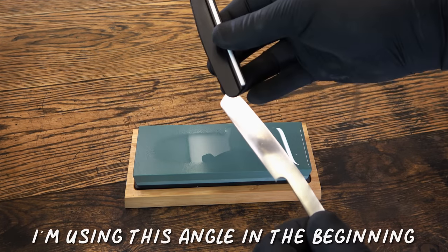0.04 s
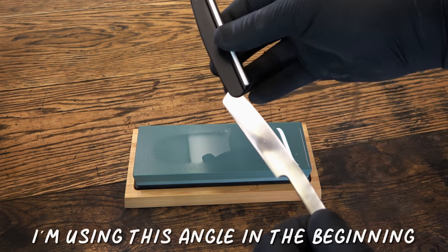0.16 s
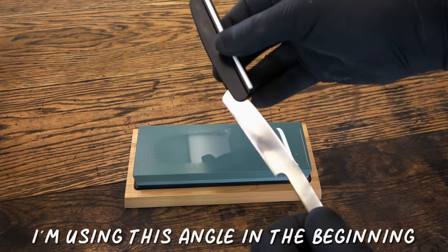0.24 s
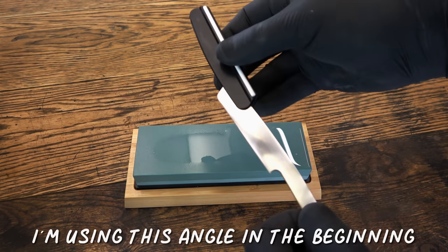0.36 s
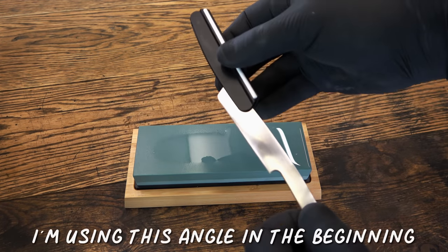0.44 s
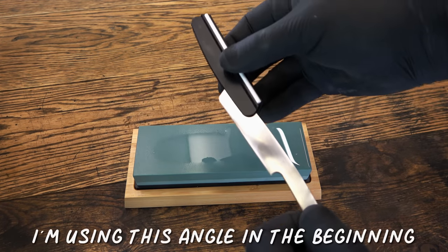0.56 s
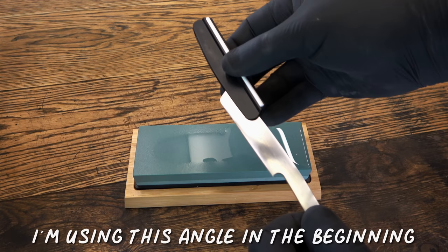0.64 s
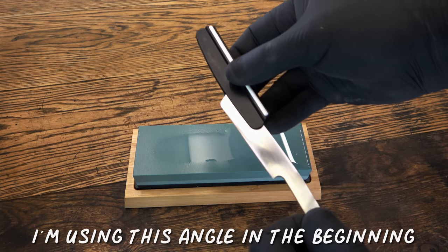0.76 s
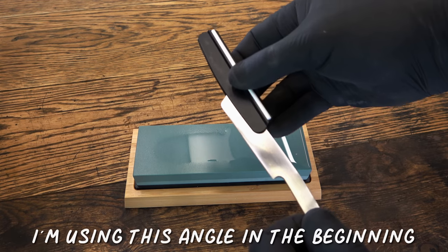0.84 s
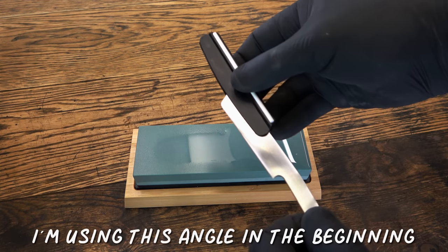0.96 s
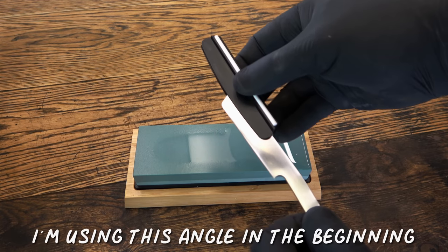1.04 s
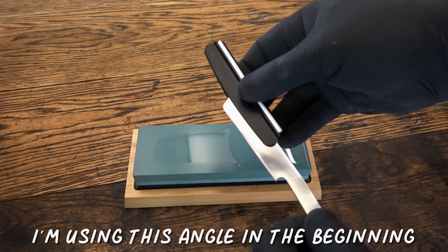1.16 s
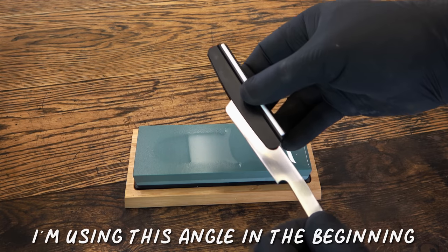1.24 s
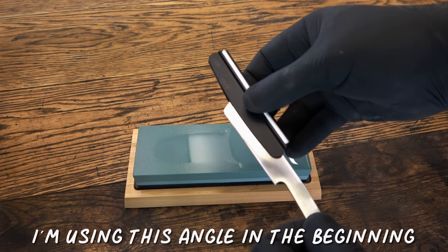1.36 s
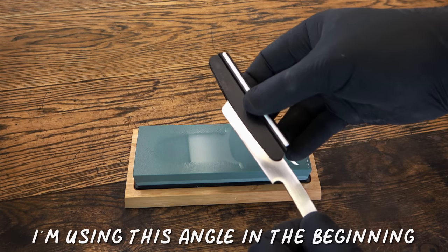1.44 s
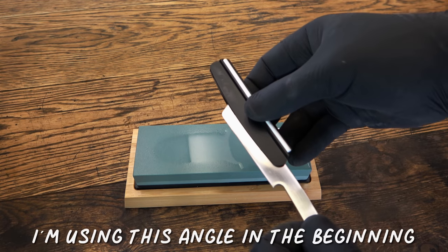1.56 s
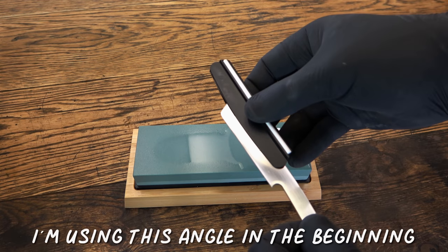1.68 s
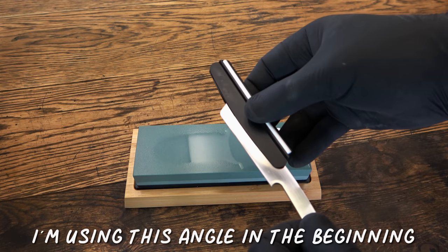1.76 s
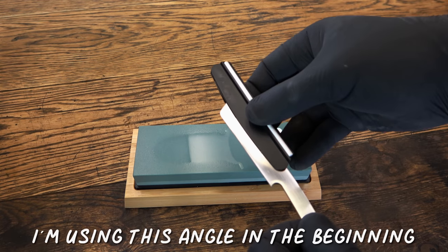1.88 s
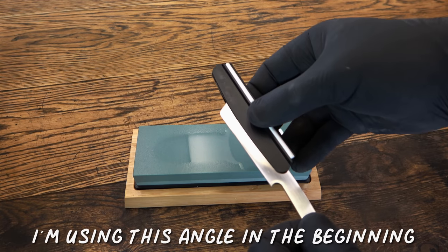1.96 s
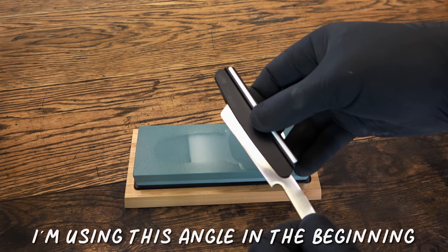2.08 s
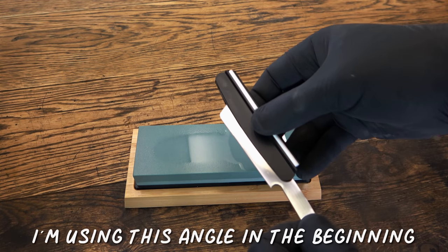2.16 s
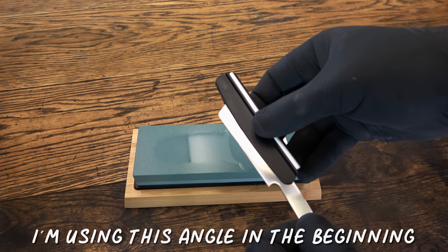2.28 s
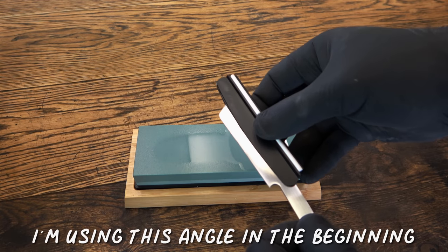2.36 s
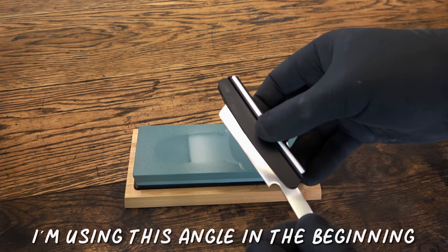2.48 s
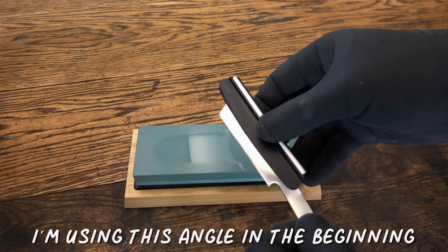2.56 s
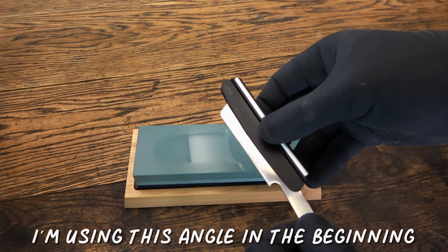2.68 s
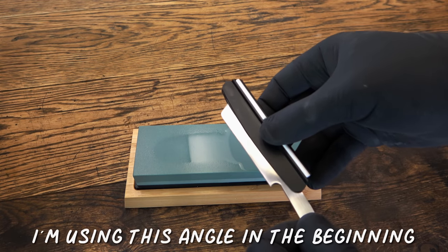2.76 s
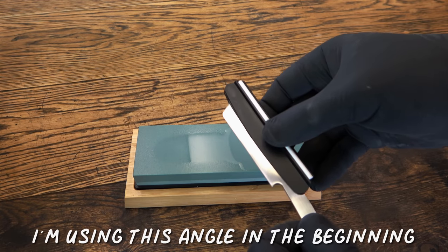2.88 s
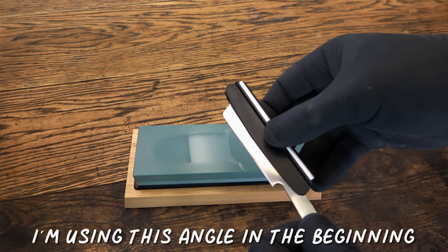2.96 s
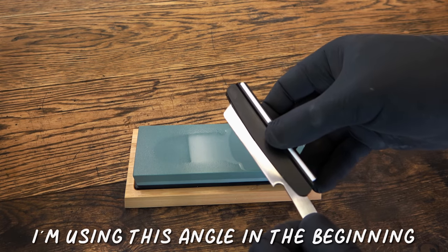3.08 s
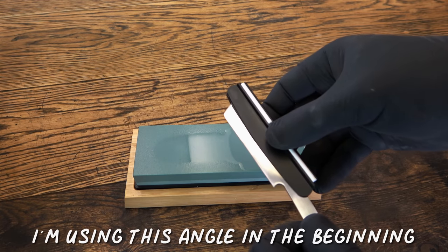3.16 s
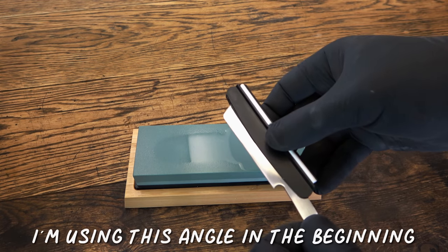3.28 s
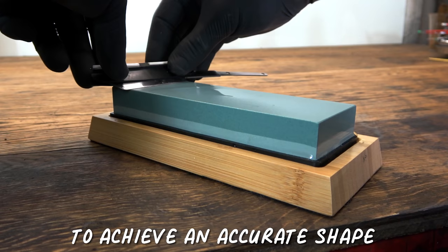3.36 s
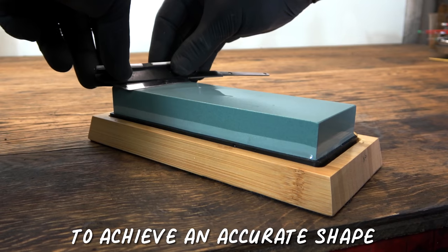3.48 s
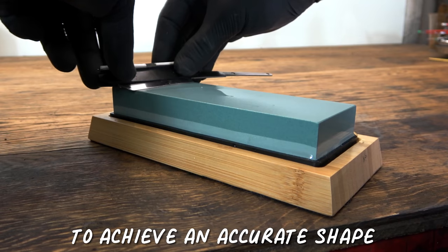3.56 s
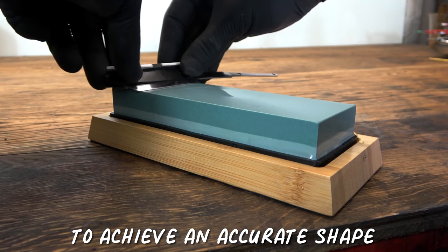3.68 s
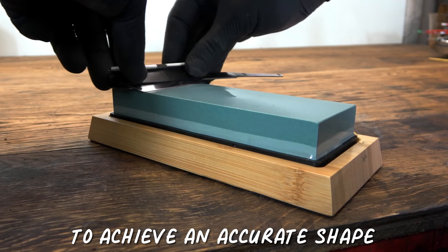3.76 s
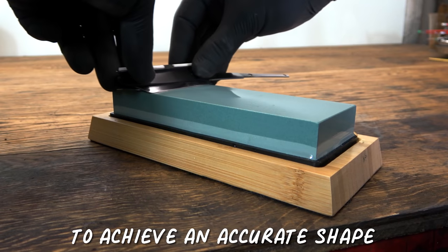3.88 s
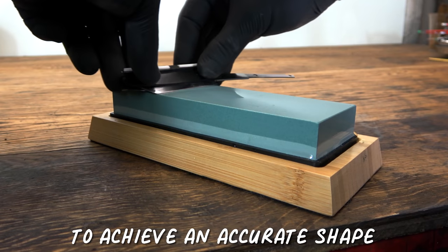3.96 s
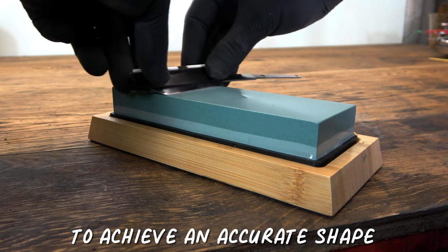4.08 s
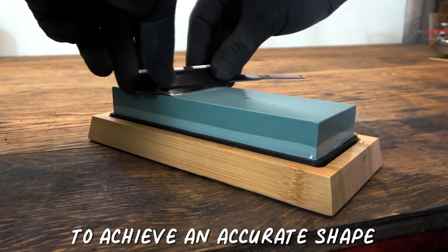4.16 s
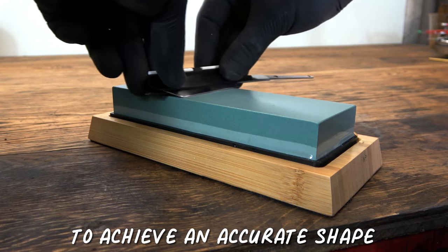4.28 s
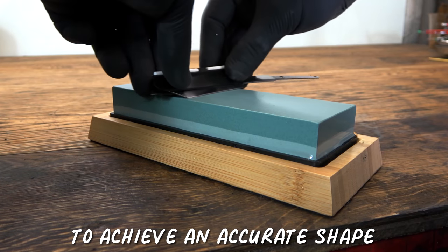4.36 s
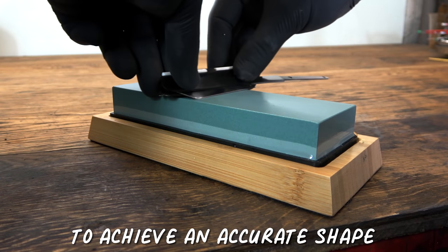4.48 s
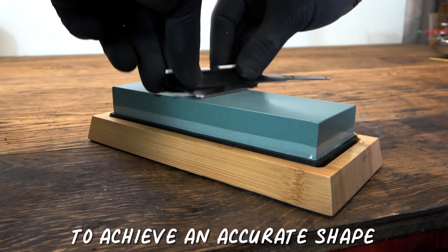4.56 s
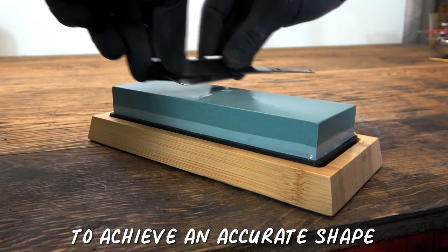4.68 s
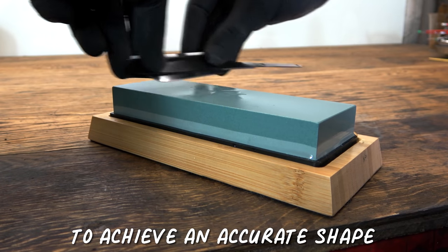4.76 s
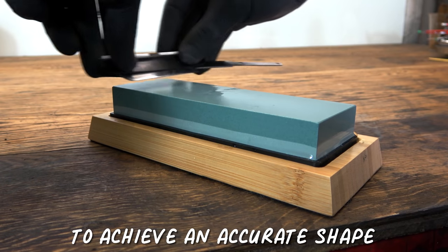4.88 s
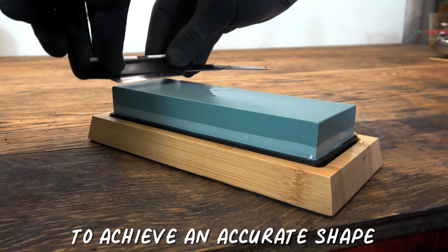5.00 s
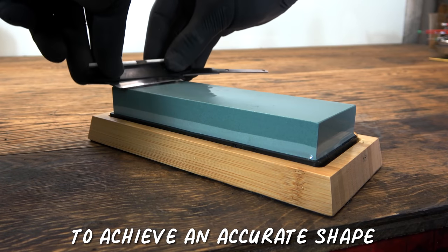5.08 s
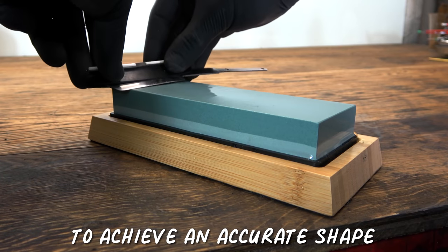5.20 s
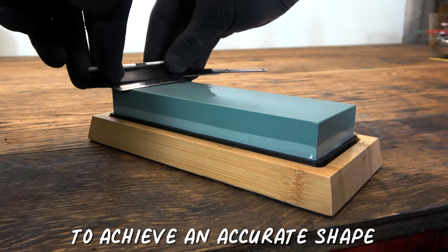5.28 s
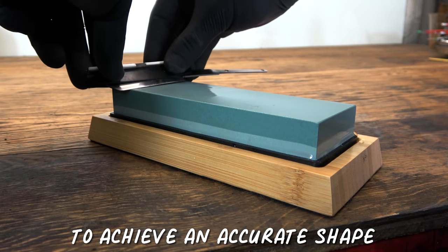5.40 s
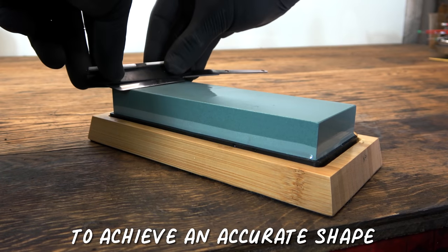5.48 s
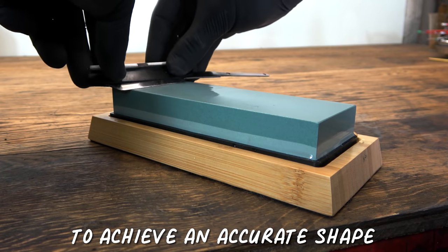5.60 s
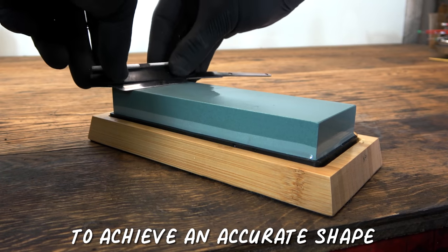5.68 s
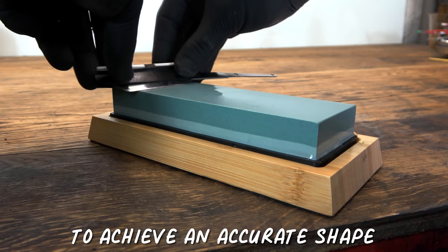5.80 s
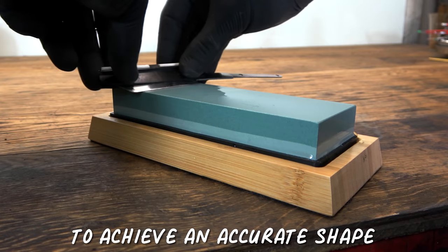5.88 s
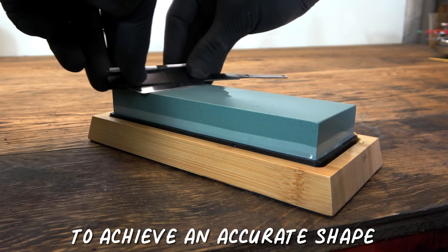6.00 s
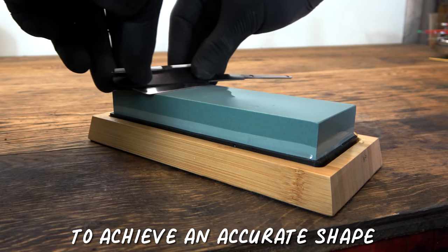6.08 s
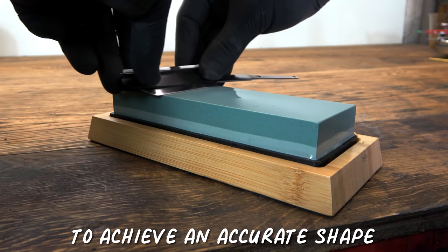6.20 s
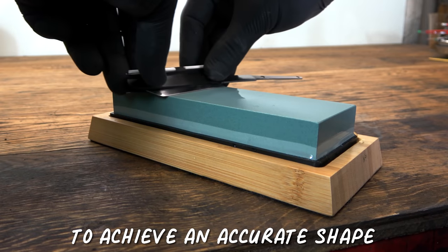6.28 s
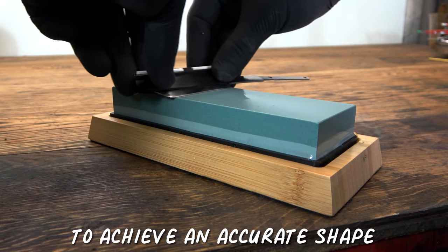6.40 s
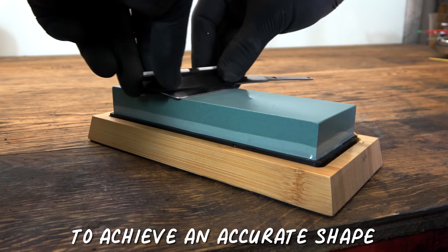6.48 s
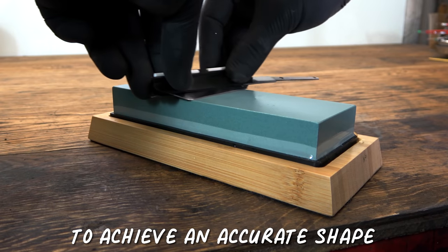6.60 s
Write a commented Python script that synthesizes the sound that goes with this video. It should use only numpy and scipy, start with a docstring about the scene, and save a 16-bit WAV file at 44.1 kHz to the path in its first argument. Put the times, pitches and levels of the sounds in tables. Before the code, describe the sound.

A close, dry take in a quiet workshop with a faint, steady hiss. From about 0.2 to 1.5 seconds a thin steel blade barely touches a wet whetstone: a small tick near 0.35, brief airy slides, another tick near 1.1. Soft, dull knocks from the wooden base come around 1.7 to 1.9, then it is almost silent. At 3.5 a double click bites into a firm, even, gritty scrape, bright and hissing with metallic resonance and a coarse stone rasp beneath. Around 4.34 the edge sticks for an instant and snaps loose with sharp clicks, continuing until about 4.65, when it lifts abruptly. The background is now quieter. Between 5.3 and 5.7 a flurry of tiny metallic taps and grazes grows stronger, and at about 5.74 a sharper tick opens the second firm scrape, which swells quickly and stays steady, slightly darker, until about 6.65.

```python
"""First comes a faint hiss with small ticks and light slides: a thin steel blade is eased across a wet whetstone.
It is then pressed into a firm stroke from tip to heel, lifted, set down with taps and pushed into a second stroke.
Grit rubs the edge into noise, and the blade's resonances change with the place where the edge touches.
The stone adds a coarse rasp, its wooden base dull knocks and rumble, and the quiet workshop a short, weak echo."""
import sys
import numpy as np
from scipy import signal
from scipy.fft import rfft, irfft, next_fast_len
from scipy.io import wavfile
from scipy.ndimage import map_coordinates

SR = 44100
rng = np.random.default_rng(int(sys.argv[2]) if len(sys.argv) > 2 else 0)


def put_to_file(sound):
    """Save the sound as 16-bit audio at rate SR, in the file named by the first command-line argument."""
    columns = np.atleast_2d(sound).T  # one column per channel
    safe = np.clip(columns, -1, 1)
    whole_steps = np.round(safe * 32767)
    wavfile.write(sys.argv[1], SR, whole_steps.astype(np.int16))


N = 292824

# background hiss before and after the firm strokes begin: pitch_hz, level_db (per Hz)
EARLY_AIR = [(12, -27), (25, -3.5), (400, -4.5), (1400, -12), (4820, -16), (14000, -20), (15000, -38)]
LATE_AIR = [(20, -11), (80, -6.5), (200, -10.5), (290, -6.5), (430, -12), (1000, -12.5), (2500, -21.5),
            (15000, -25)]
EARLY_DB, LATE_DB = -65.5, -79  # overall level of each hiss

# soft low tones that swell and die away while the blade is handled: start_s, pitch_hz, level_db, fall_s (for 20 dB)
HUMS = [(1.07, 428, -67, 0.17), (5.3, 307, -80.5, 0.4), (5.315, 907, -87, 1)]
# soft knocks of the stone in its wooden base: start_s, peak_db
KNOCKS = [(1.723, -45.5), (1.906, -50), (5.629, -59), (5.645, -58)]
# resonances of the wooden base: pitch_hz, width_hz, level_db
BASE = [(193.8, 290, 1), (480, 440, 7), (1180, 1400, -11)]
# resonances of the stone on its mat: pitch_hz, width_hz, level_db
STONE = [(960, 170, -13), (1120, 1400, -10)]

# resonances of the blade for each kind of contact, all with columns: pitch_hz, width_hz, level_db
SKIM = [(2040, 240, 0), (3800, 1540, -18), (5570, 130, 3), (6450, 560, -4.5), (7200, 190, -0.5),
        (8950, 3000, -19)]  # barely resting on the stone
GLIDE = [(2163, 360, 1), (3950, 740, -1), (5550, 450, -7), (6660, 900, -10)]  # floating on the film of water
SQUEAK = [(2100, 250, -7), (4060, 330, 0), (6500, 900, -14)]  # skating on the wet stone
FILM = [(2200, 220, 0), (4000, 900, -15)]  # hardly any weight on the wet stone
SCUFF = [(2060, 280, 0), (3680, 380, 0), (4700, 450, -9)]  # pushed off with a little more weight
DRAG = [(2050, 230, -0.5), (3610, 190, 5.5), (4540, 860, -12)]  # drawn lightly
POINT = [(2180, 260, -17), (5510, 150, 1), (6840, 300, 1), (10400, 6000, -30)]  # only the point touches
FREE = [(1850, 125, 4), (3550, 550, -18), (5200, 900, -21), (7000, 6500, -31)]  # held clear of the stone, ringing a little longer
LANDING = [(1880, 130, -1), (2450, 300, -19), (4810, 280, 3.5), (6000, 1800, -24)]  # grazing the stone from the air
TOUCH = [(1905, 150, 3), (4290, 110, -15), (4840, 350, -9), (6030, 250, -25), (9000, 6000, -52)]  # set down gently
PERCH = [(1780, 260, 4), (2540, 240, -12), (3880, 640, -16), (5150, 380, 2), (6000, 330, -7),
         (8000, 4500, -26.5)]  # rocking onto the edge
TIP = [(1880, 730, 6.5), (2500, 560, 0), (3500, 300, -2), (4006, 370, 0.5), (5110, 500, 3),
       (5680, 1300, -6.5), (8300, 3100, -10.5), (10530, 250, -4.5), (11400, 700, -21), (13970, 1620, -23.5),
       (15500, 670, -23)]  # pressed near the tip
BELLY = [(1920, 430, 1.5), (2500, 700, -11.5), (3360, 750, -14.5), (3940, 450, -9.0), (5160, 700, -10),
         (6200, 1000, -15.5), (8020, 880, -14.0), (9980, 1160, -21.0), (16480, 6250, -36.5)]  # pressed between tip and mid-edge
MIDDLE = [(1965, 440, 3), (3100, 750, -14.5), (3930, 450, -5.5), (5420, 1370, -9.0), (6760, 810, -13.0),
          (8020, 990, -13.0), (10250, 1900, -20), (16480, 2150, -28.0)]  # pressed at mid-edge
HEEL = [(2004, 514, -0.5), (2980, 400, -14.5), (3870, 810, -7), (5300, 1730, -11.5), (6520, 560, -9.5),
        (7680, 3110, -15), (9700, 1370, -18), (13800, 2600, -31)]  # pressed near the heel
FLAT_TIP = [(1910, 500, 0), (2650, 280, -15.5), (3870, 680, -9.5), (4840, 320, -6), (5470, 1100, -12.5),
            (7030, 440, -17), (8400, 1380, -18), (10600, 720, -19.5), (13290, 1420, -29.5),
            (15520, 1120, -32)]  # bevel flat on the stone, weight towards the tip
FLAT_HEEL = [(1680, 250, -12), (1986, 317, -0.5), (3840, 960, -15), (4650, 1300, -15.5), (5410, 980, -18.5),
             (6560, 710, -23), (7770, 1240, -20.5), (9320, 1200, -28), (10600, 800, -28),
             (14000, 2400, -32)]  # bevel flat on the stone, weight towards the heel

# contacts that keep their pitch: one list of resonances each (pitch_hz, width_hz, level_db)
STEADY = (SKIM, GLIDE, SQUEAK, FILM, POINT, FREE, LANDING, PERCH)
# contacts whose resonances sink in pitch: kinds of contact, sink_per_s (share of the pitch), above_hz
SINKS = [((TIP, BELLY, MIDDLE, HEEL, FLAT_TIP, FLAT_HEEL), .1, 7200), ((DRAG, SCUFF), .25, 2800), ((TOUCH,),
         1.6, 1000)]
# light slides of the edge: start_s, length_s, level_db, attack_s (for 20 dB), sag_db_per_s, resonances
SLIDES = [(.352, .1, -47.5, .025, 85, SKIM), (.43, .06, -56, .055, 0, SQUEAK),
          (.62, .11, -65.5, .14, 10, GLIDE), (.772, .05, -54.5, .06, 30, SCUFF),
          (.82, .16, -57.5, .07, 70, DRAG), (.96, .19, -67.5, .07, 18, FILM),
          (1.08, .07, -56.5, .05, 25, POINT), (1.275, .025, -68.5, .1, 5, FILM),
          (1.458, .05, -64.5, .05, 30, SKIM), (1.462, .055, -65, .08, 5, GLIDE),
          (1.98, .6, -76, .3, 3, GLIDE), (5.447, .018, -50, .018, 5, LANDING),
          (5.484, .022, -55, .013, 150, LANDING), (5.542, .008, -37, .017, 5, TOUCH),
          (5.58, .1, -66.5, .02, 3, PERCH), (5.653, .008, -51, .004, 5, PERCH),
          (5.688, .035, -47, .005, 5, PERCH), (5.694, .03, -44, .008, 0, TIP),
          (5.733, .016, -27.5, .022, 5, TIP)]
# firm strokes: start_s, length_s, level_db, attack_s (for 20 dB), shortfall_db (while gathering speed),
# resonances passed on the way
STROKES = [(3.483, 1.166, -25, .005, 1.32, (TIP, BELLY, MIDDLE, HEEL)),
           (5.75, .9, -24.5, .03, 8.5, (FLAT_TIP, FLAT_HEEL))]
# the edge digs into the stone and works free: start_s, level_db, fade_db_per_s
BITES = [(3.495, -41, 133), (3.629, -42, 37), (4.184, -55.5, 452), (4.354, -42.5, 753), (5.731, -35, 602),
         (5.785, -61, 52)]
# the edge taps the stone or catches a coarse grain: start_s, level_db, resonances
TICKS = [(.2184, -46.5, SKIM), (.3545, -26.5, SKIM), (1.072, -30.5, POINT), (3.486, -12.5, TIP),
         (3.4994, -12, TIP), (4.3349, -7, HEEL), (4.3548, -4, MIDDLE), (5.2865, -46, FREE),
         (5.4265, -44.5, LANDING), (5.442, -37.5, LANDING), (5.479, -29, LANDING), (5.5245, -30.5, TOUCH),
         (5.5499, -22.5, TOUCH), (5.6222, -27.5, PERCH), (5.6529, -41, PERCH), (5.686, -29, PERCH),
         (5.696, -28.5, PERCH), (5.744, -15, TIP)]
# level of the treble in the first stroke: time_s, level_db
TREBLE = [(3.5, -1), (3.63, 5), (3.85, 3), (4.15, .5), (4.36, -4.5), (4.5, -.5), (4.66, -2)]

TOP_HZ = 15850  # upper limit of the sound
SPEED_UP_S, LIFT_S = .11, .029  # time to gather speed; time to fall 20 dB as the edge lifts
TRAVEL_FROM, TRAVEL_SHARE = .27, .56  # the part of a stroke in which the contact moves along the edge
RELEASE_RATIO = 1.1  # a slide's release over its attack
ECHO_START_S, ECHO_END_S, ECHO_DB = .00041, .00048, -18  # round trip from the contact to the end of the blade
DIP_HZ, DIP_WIDTH_HZ, DIP_DB = 12300, 380, -11  # a narrow band in which the blade barely sounds
TREBLE_TRADE = .55  # dB that the scrape loses for each dB of treble
STALL_S, STALL_LENGTH_S, STALL_DB = 4.343, .009, -8  # the edge sticks for a moment before it slips on
BITE_ATTACK_S, STEADY_BITE_DB = 0.036, -44  # a bite's rise by 20 dB; the rasp under any firm scrape
RASP_RISE_PER_S = .33  # relative climb of the rasp's pitch as the edge works free after a bite
SINK_SPAN_S = .3  # the sinking is limited beyond this time on either side of a contact's middle
HUM_ATTACK_S = 0.046  # time for a hum to rise 20 dB


def amp(db):
    """Decibels to gain."""
    return 10 ** (np.asarray(db) / 20)


def unit(x):
    """x scaled to an average (rms) strength of 1."""
    return x / np.sqrt(np.mean(x ** 2) + 1e-20)


def curve(times, values, outside=None):
    """One value per sample, joined by straight lines."""
    return np.interp(np.arange(N) / SR, times, values, left=outside, right=outside)


def wobble(rate):
    """A smooth random curve with rate random points a second."""
    points = rng.standard_normal(int(N * rate / SR) + 4)
    return unit(map_coordinates(points, [np.arange(N) * rate / SR]))


def envelope(start, length, attack, release, sag=0):
    """Attack, sagging hold (dB per s) and release; attack and release are the times for 20 dB."""
    t = np.arange(N) / SR - start
    outside = np.maximum(-t, 0) / attack + np.maximum(t - length, 0) / release
    level_db = -20 * outside - sag * np.clip(t, 0, length)
    return amp(np.maximum(level_db, -200))


def progress(start, length):
    """How far a stroke has come, from 0 to 1."""
    return curve([start, start + length], [0, 1])


def filtered(x, response):
    """x with each frequency scaled by response(hz)."""
    size = next_fast_len(N + SR // 4)
    return irfft(rfft(x, size) * response(np.fft.rfftfreq(size, 1 / SR)), size)[:N]


def high_pass(hz, edge_hz, order):
    """Gain that falls below edge_hz by 6 dB an octave for each order."""
    return 1 / np.sqrt(1 + (edge_hz / (hz + 1)) ** (2 * order))


def ring(modes, low_hz, order, size=4096):
    """How a body of energy 1 rings after one sharp hit; it is too small to radiate below low_hz."""
    hz = np.fft.rfftfreq(size, 1 / SR) + 1
    power = np.zeros(len(hz))
    for centre, width, db in modes:
        detuning = (hz ** 2 - centre ** 2) / (hz * width)
        power += (amp(db) / (1 + detuning ** 2)) ** 2
    # fold the log spectrum so that the ringing starts at the hit, never before it
    cepstrum = irfft(np.log(np.sqrt(power) * high_pass(hz, low_hz, order) + 1e-6))
    cepstrum[1:size // 2] *= 2
    cepstrum[size // 2 + 1:] = 0
    response = irfft(np.exp(rfft(cepstrum)))
    return response / np.linalg.norm(response)


def through(x, response):
    """x sent through a body that rings with the given response."""
    return signal.oaconvolve(x, response)[:N]


def impulses(rows):
    """One single-sample hit for each (start_s, level_db) row."""
    times, db = np.transpose(rows)
    return np.bincount(np.round(times * SR).astype(int), amp(db), N)[:N]


def air(spectrum, db):
    """Steady background noise of a given colour."""
    points_hz, points_db = np.transpose(spectrum)
    colour = lambda hz: amp(np.interp(np.log(hz + 1), np.log(points_hz), points_db))
    return amp(db) * unit(filtered(rng.standard_normal(N), colour))


def background():
    """The hiss falls to a lower level as the firm strokes begin."""
    early = curve([3.45, 3.65], [1, 0])
    return early * air(EARLY_AIR, EARLY_DB) + (1 - early) * air(LATE_AIR, LATE_DB)


def workshop(x, t60, wet_db):
    """The short, weak answer of the room: noise that dies away by 60 dB in t60 seconds."""
    t = np.arange(SR // 3) / SR
    tail = rng.standard_normal(len(t)) * amp(-60 * t / t60)
    tail *= t > .003  # the first reflections take 3 ms
    return x + amp(wet_db) * through(x, tail / np.linalg.norm(tail))


def hums():
    """Faint low tones, each a single resonance that swells and dies away."""
    t = np.arange(N) / SR
    total = np.zeros(N)
    for start, hz, db, fall in HUMS:
        tone = unit(np.sin(2 * np.pi * hz * t))
        total += amp(db) * envelope(start, 0, HUM_ATTACK_S, fall) * tone
    return total


def base(scrape):
    """The wooden base gives dull knocks and carries a faint rumble of the strokes."""
    response = ring(BASE, low_hz=59.6, order=4)
    knocks = impulses(KNOCKS) / np.abs(response).max()
    rumble = amp(-52) * scrape * rng.standard_normal(N)
    return through(knocks + rumble, response)


def grit(clump_db, clump_rate, shudder_db, shudder_rate):
    """Rubbing strength of rms 1: grains pass in quick clumps, and the sliding edge shudders more slowly."""
    return unit(amp(clump_db * wobble(clump_rate) + shudder_db * wobble(shudder_rate)))


def stone(scrape):
    """Where the pressed edge digs in, the stone answers with a lower, coarser rasp that climbs as it thins out;
    hard taps knock it deeper."""
    digging = sum(amp(db) * envelope(s, 0, BITE_ATTACK_S, 20 / fade) for s, db, fade in BITES)
    pressed = np.minimum(scrape / amp(-44), 1)
    bite = amp(STEADY_BITE_DB) * scrape + pressed * digging

    t = np.arange(N) / SR
    starts = np.array([row[0] for row in BITES])
    latest = starts[np.searchsorted(starts, t + BITE_ATTACK_S) - 1]
    since_bite = np.clip(t - latest, 0, .5)
    grinding = through(rng.standard_normal(N), ring(STONE, low_hz=920, order=14))
    # reading the noise ever faster raises its pitch
    position = np.cumsum(1 + RASP_RISE_PER_S * since_bite) % N
    climbing = np.interp(position, np.arange(N), grinding)
    rasp = bite * grit(clump_db=0.0, clump_rate=91, shudder_db=2.5, shudder_rate=49) * climbing

    knocks = amp(-18.5) * impulses([(s, db) for s, db, modes in TICKS])
    return rasp + through(knocks, ring(STONE, low_hz=520, order=4))


def slides():
    """(gain, resonances) of the light slides: each swells, sags and lets go."""
    contacts = []
    for start, length, db, attack, sag, modes in SLIDES:
        gain = amp(db) * envelope(start, length, attack, RELEASE_RATIO * attack, sag)
        contacts.append((gain, modes))
    return contacts


def strokes():
    """(gain, resonances) of the firm strokes: each gathers speed while its contact travels from tip to heel."""
    contacts = []
    for start, length, db, attack, shortfall_db, path in STROKES:
        done = progress(start, length)
        speed_db = -shortfall_db * np.exp(-done * length / SPEED_UP_S)
        gain = envelope(start, length, attack, LIFT_S) * amp(db + speed_db)
        place = np.clip((done - TRAVEL_FROM) / TRAVEL_SHARE, 0, 1) * (len(path) - 1)
        for k, modes in enumerate(path):
            nearness = np.maximum(1 - np.abs(place - k), 0)
            contacts.append((gain * np.sqrt(nearness), modes))
    return contacts


def taps(rows, crush_time, crush_db, snap_db):
    """Each tap crushes a few grains around one sharp snap."""
    hits = impulses(rows)
    t = np.arange(-SR // 100, SR // 100) / SR
    bell = np.exp(-(t / crush_time) ** 2)
    crushing = signal.oaconvolve(hits, bell / np.linalg.norm(bell), mode="same")
    return amp(snap_db) * hits + amp(crush_db) * crushing * rng.standard_normal(N)


def rubbed(friction, response, sink_per_s, above_hz):
    """Friction noise in resonances whose upper part sinks in pitch around the middle of the contact."""
    n, effort = np.arange(N), np.cumsum(friction ** 2)
    middle = np.searchsorted(effort, effort[-1] / 2)
    from_middle_s = np.clip((n - middle) / SR, -SINK_SPAN_S, SINK_SPAN_S)
    # reading the sound ever slower lowers its pitch
    position = np.cumsum(1 - np.clip(sink_per_s * from_middle_s, -.5, .5))
    position += middle - position[middle]
    ringing = through(np.interp(n, position, friction) * rng.standard_normal(N), response)
    sinking = map_coordinates(ringing, [position])
    still = through(friction * rng.standard_normal(N), response)
    upper = lambda hz: high_pass(hz, above_hz, order=12)
    lower = lambda hz: np.sqrt(1 - upper(hz) ** 2)
    return filtered(sinking, upper) + filtered(still, lower)


def blade(rubs, hiss_db):
    """Friction and taps ring the blade, with the resonances of the place where the edge touches."""
    kinds_of_contact = [(modes, None) for modes in STEADY]
    for kinds, *sink in SINKS:
        kinds_of_contact += [(modes, sink) for modes in kinds]

    steel = np.zeros(N)
    for modes, sink in kinds_of_contact:
        response = ring(modes, low_hz=1401, order=26)
        friction = np.sqrt(sum(gain ** 2 for gain, contact in rubs if contact == modes))
        if sink:
            steel += rubbed(friction, response, *sink)
        else:
            steel += through(friction * rng.standard_normal(N), response)
        ticks = [(s, db) for s, db, contact in TICKS if contact == modes]
        if ticks:
            tapping = taps(ticks, crush_time=.0017, crush_db=-6.5, snap_db=-4)
            steel += through(tapping, response / np.abs(response).max())

    steel = filtered(steel, lambda hz: amp(DIP_DB * np.exp(-((hz - DIP_HZ) / DIP_WIDTH_HZ) ** 2)))
    hiss = filtered(steel, lambda hz: high_pass(hz, edge_hz=2700, order=6))
    # short waves come back inverted from the end of the blade; as the contact travels, their ripple glides
    t, done = np.arange(N) / SR, np.zeros(N)
    for start, length, *_ in STROKES:
        done += progress(start, length) * (t < start + length)
    delay = (ECHO_START_S + (ECHO_END_S - ECHO_START_S) * done) * SR
    echo = np.interp(np.arange(N) - delay, np.arange(N), hiss)
    return steel + (amp(hiss_db) - 1) * hiss - amp(hiss_db + ECHO_DB) * echo


def scene():
    """A pressed edge scrapes evenly; a light one skips from grain to grain."""
    firm = strokes()
    hiss_db = curve(*np.transpose(TREBLE), 0)
    even = amp(-TREBLE_TRADE * hiss_db) * grit(clump_db=1.1, clump_rate=800, shudder_db=0.2, shudder_rate=73)
    even *= amp(STALL_DB * envelope(STALL_S, STALL_LENGTH_S, attack=.004, release=.002))
    skipping = grit(clump_db=2.5, clump_rate=450, shudder_db=1.1962, shudder_rate=61)
    rubs = [(gain * even, modes) for gain, modes in firm]
    rubs += [(gain * skipping, modes) for gain, modes in slides()]
    scrape = np.sqrt(sum(gain ** 2 for gain, modes in firm))
    honing = hums() + base(scrape) + stone(scrape) + blade(rubs, hiss_db)
    return background() + workshop(honing, t60=0.14, wet_db=-14.5)


def record(dry):
    """The sound closes with a very short fade; nothing is kept above the band limit."""
    fade = np.minimum(1, np.arange(N)[::-1] / (.004 * SR))
    return filtered(dry * fade, lambda hz: np.clip((TOP_HZ - hz) / 200 + .5, 0, 1))


dry = scene()
out = record(dry)
put_to_file(out)
```